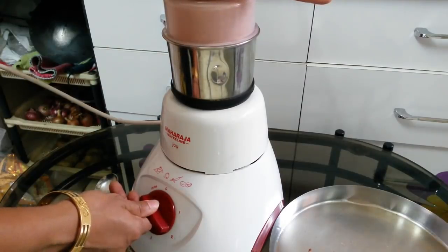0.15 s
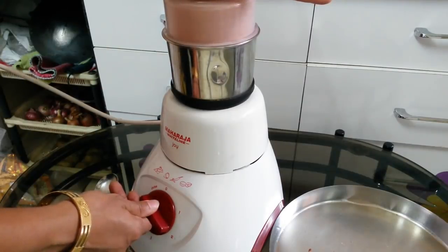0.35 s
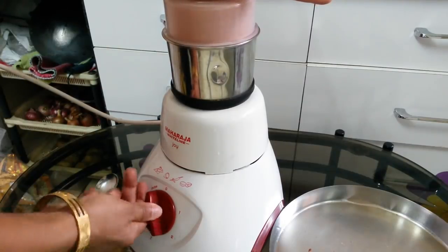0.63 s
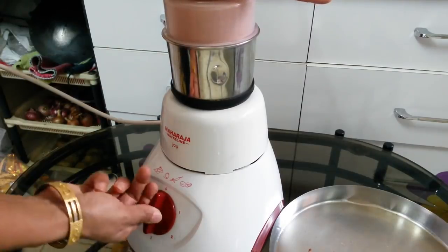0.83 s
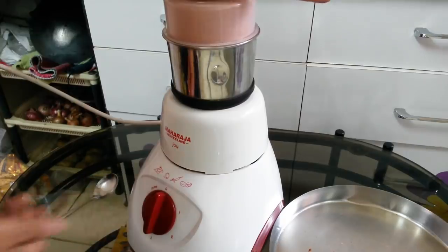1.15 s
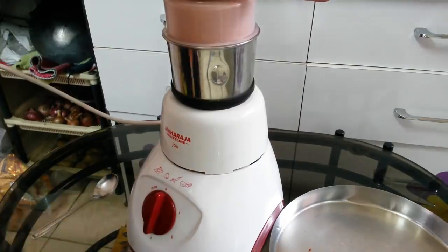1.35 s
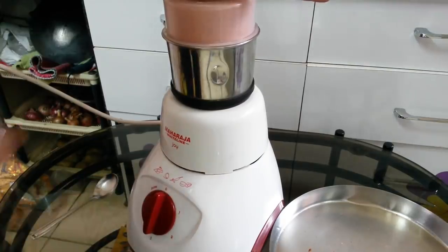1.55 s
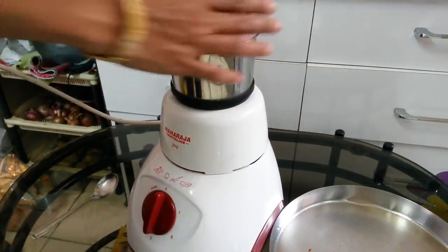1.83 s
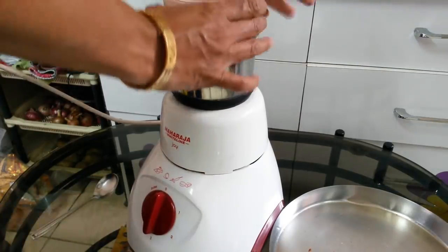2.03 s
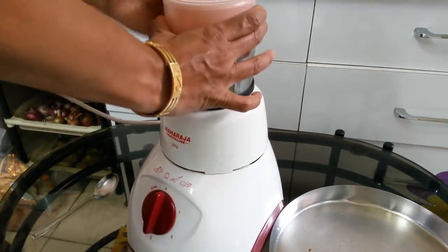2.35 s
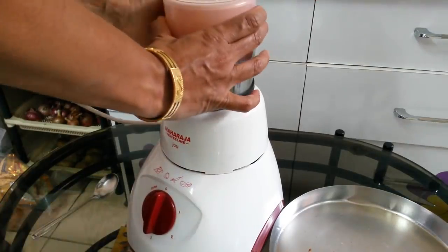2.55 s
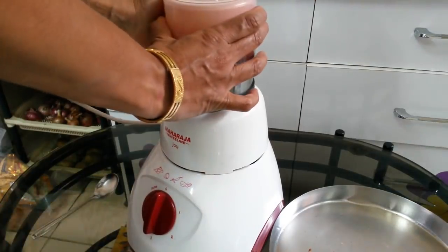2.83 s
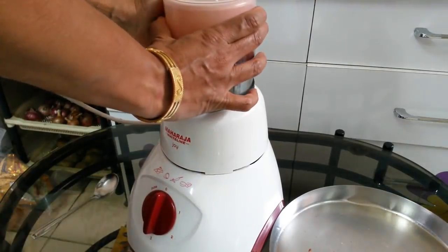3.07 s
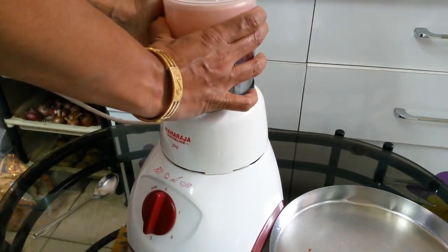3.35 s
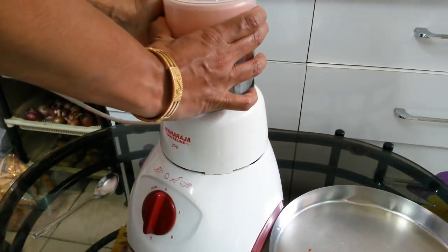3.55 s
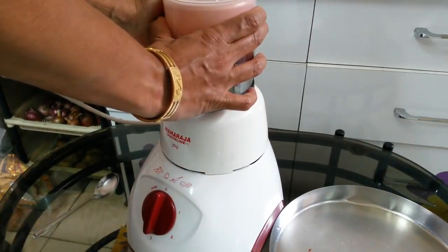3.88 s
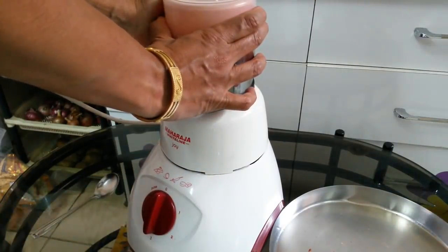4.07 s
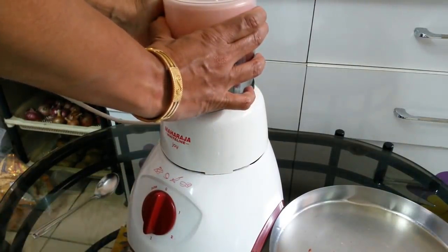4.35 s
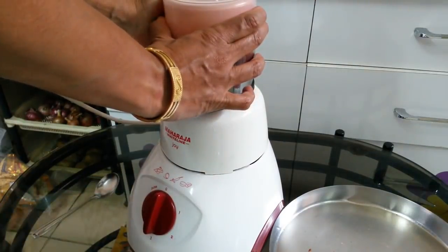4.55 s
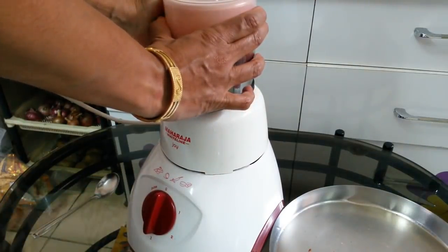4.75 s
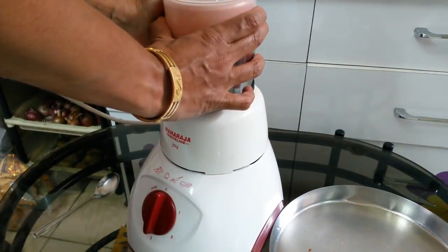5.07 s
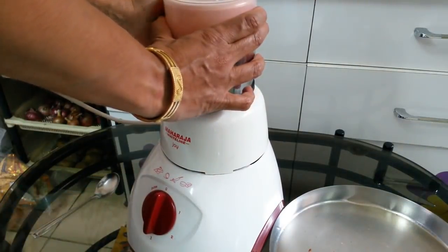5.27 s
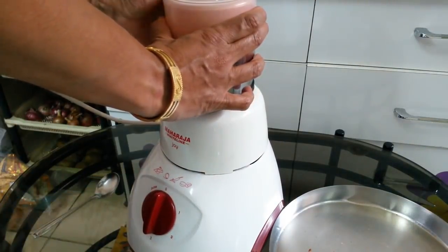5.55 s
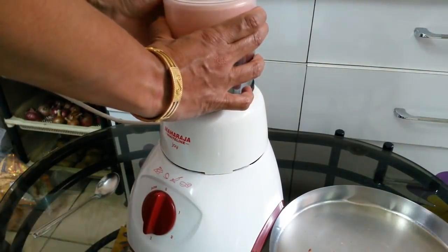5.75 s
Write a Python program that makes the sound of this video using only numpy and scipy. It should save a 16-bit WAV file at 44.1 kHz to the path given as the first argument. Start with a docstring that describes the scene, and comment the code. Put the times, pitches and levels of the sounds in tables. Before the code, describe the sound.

A mixer grinder is running at full roar from the first instant, heard very close in a tiled kitchen with tight, bright reflections. Dry slices churn in a steel jar as dense midrange rushing noise, covered by a hissing hail of grit, coarser and brighter at first, then more powdery. Beneath lies a steady low motor hum around 260 to 275 hertz, a rough coupling chatter and a thin whine. At 0.84 seconds the speed knob snaps with a hard, dry click; the motor sags for a moment, then eases up slightly in pitch over about half a second. Sharp metallic ticks dot the sound, notably at 0.4, 0.75, 2.7 and 3.2 seconds, with brief crunches between. From 1.9 to 2.3 seconds a hand closes on the jar, making the grind somewhat louder and more resonant. Soft low thuds come near 3, 4.1 and 5.4 seconds. The grinding continues to the end, about 5.9 seconds.

```python
"""An electric mixer grinder chops dry slices in a steel jar, close by in a tiled kitchen.
Blades, fan and commutator are tones locked to one shaft; its speed knob clicks up a step, the motor
sags and climbs, then a hand presses the jar down. Churning slices and a hail of grit are impacts and
noise ringing the jar through rushing air; crunches are bites of noise, chips ringing ticks.
The drive coupling chatters, and the base thuds softly on a glass table as low decaying sines."""
import sys
import numpy as np
from scipy import signal
from scipy.fft import rfft, irfft
from scipy.io import wavfile
from scipy.ndimage import uniform_filter1d

SR = 44100
rng = np.random.default_rng(int(sys.argv[2]) if len(sys.argv) > 2 else 0)


def wrap_up_sound(samples):
    """Save the sound to the file named by the first command line argument, as 16-bit audio."""
    columns = np.atleast_2d(samples).T
    # keep every value between -1 and 1, then stretch to whole-number steps
    tamed = np.clip(columns, -1, 1)
    steps = np.round(tamed * 32767).astype(np.int16)
    wavfile.write(sys.argv[1], SR, steps)


N = 260631
T = np.arange(N) / SR  # s
FREQ = np.maximum(np.arange(N // 2 + 1) * SR / N, 1)  # Hz

BLADES, FAN_VANES, BARS = 3, 21, 36  # parts round the shaft; bars are on the commutator
KNOB_S = .8403  # the speed knob clicks


def shaft_speed():
    """Steady on the low setting, a sag as the knob turns, then an easing climb to the high one."""
    low_hz, high_hz, sag_hz = 86.95, 92.0, 2.7  # turns per second
    coast_s, pickup_s, climb_s = .08, .03, .29  # the pickup comes just after the click
    since = T - KNOB_S - pickup_s
    coasting = low_hz - sag_hz * np.clip(1 + since / coast_s, 0, 1)
    return high_hz + (coasting - high_hz) * np.exp(-np.maximum(since, 0) / climb_s)


def motor(turns, load_db, grip):
    """Three blades hum, the rotor adds weaker orders, the fan's whine wavers, commutator bars sing."""
    # rotor tones: [multiples of shaft speed], and their [level against the blade hum, dB]
    rotor_orders = [2, 4, 6, 7, 9, 10, 25, 64]
    rotor_db = [-19, -16.5, -15.5, -22, -18.5, -22, -17.5, -14]
    # the blade hum swells or dips briefly: (time [s], half length [s], change [dB])
    hum_swells = [(.838, 0.013, -4), (.94, 0.053, 5), (1.25, .08, 0), (1.425, 0.04, -5.5), (1.86, 0.04, -3),
                  (2.3, 0.022, 5.5), (2.4, 0.022, 0), (2.82, 0.017, -2), (3.09, 0.023, -2.5),
                  (4.05, .025, 0), (4.51, .03, 3), (5.462, 0.13, 2.5)]
    # fan whine, flaring as the motor climbs and firming up late: (time [s], level [dB])
    fan_level = [(0, -35), (.3, -31), (.8, -33), (.9, -36), (1.0, -35), (1.07, -24.5), (1.15, -33.5),
                 (1.33, -31), (1.42, -35), (1.6, -39), (1.9, -34.5), (4.2, -36), (4.55, -31.5), (5.9, -34)]
    hum_db, hum_follow = -30, 1.06  # level at mean load; dB gained per dB of load
    throb_hz, throb_depth = 10.2, .16
    ripple_hz, ripple_depth = 100, .2  # the torque pulses twice per mains cycle
    brush_db, brush_grows_s, brush_db_per_s = -38, 2.7, 3  # commutator whine, and when it starts to grow
    rotor_loose_db = -3.5  # hand off against full grip: the pressed jar couples to the shaft

    hum = undb(hum_db + hum_follow * load_db + swells(hum_swells) + 0.16 * walk(4.9))
    throb = 1 + throb_depth * np.sin(2 * np.pi * throb_hz * T)
    ripple = 1 + ripple_depth * np.sin(2 * np.pi * ripple_hz * T)
    blade_tone = tone(turns, BLADES, flutter=0.17, flutter_hz=30.4, spread=0.39)
    blades = place(throb * ripple * blade_tone, pan_db=-4.5)
    rotor = sum(undb(db) * tone(turns, order, flutter=1.05, flutter_hz=8.4, spread=0.24)
                for order, db in zip(rotor_orders, rotor_db))
    rotor = place(rotor, pan_db=-6.0) * undb(rotor_loose_db * (0.5 - grip))

    fan = undb(curve(fan_level)[0])
    wobble = .007 * walk(9) * (.5 + .5 * grip)  # turns
    vanes = place(tone(turns + wobble, FAN_VANES, flutter=0.88, flutter_hz=26, spread=0.28), pan_db=4.0)

    brush = undb(brush_db + brush_db_per_s * np.maximum(T - brush_grows_s, 0))
    bars = tone(turns, 2 * BARS, flutter=0.4, flutter_hz=28, spread=0.63)
    # the next commutator overtone reaches the two microphone ports in opposite phase
    overtone = tone(turns, 3 * BARS, flutter=1.8, flutter_hz=28, spread=.8) * np.array([[1], [-1]])
    return hum * (blades + rotor) + fan * vanes + brush * (bars + undb(-15) * overtone)


def coupling(turns, load_db):
    """The four drive teeth chatter against the jar's coupling."""
    chatter_db = -30.5  # at mean load
    knocks = rattle(turns, order=4, sharpness=5) * rng.standard_normal((2, N))
    chatter = colour(knocks, shape([(500, -25), (1100, -6), (1800, 0), (2700, -5), (3500, -2),
                                    (6000, -1), (10000, -14)]))
    return undb(chatter_db + load_db) * unit(chatter)


def grinding(turns, load_db, grip):
    """Slices tumble and grit pelts the wall, in flurries and a little more at each blade pass."""
    # slices churning in the air stream, and grit on steel: (frequency [Hz], level [dB per Hz])
    churn_colour = [(30, -51), (70, -38), (115, -18.5), (160, -2.5), (230, -6.5), (310, -4.5), (400, -0.7),
                    (520, -5.5), (750, -4.5), (1200, -3.5), (1500, 4), (1750, 2.8), (1950, 0), (2700, -1),
                    (4500, -19.5)]
    grit_colour = [(1500, -46), (2750, -10.5), (3200, -2), (3900, -5.5), (4350, -4.5), (4800, -5.5),
                   (5600, -0.5), (6800, 0.75), (7600, 0.5), (8200, -5), (9500, -6.5), (11500, -10.3),
                   (13000, -12.5), (14500, -30)]
    # the slices fall clear of the blades for a moment: (time [s], half length [s], change [dB])
    lulls = [(1.13, 0.044, -0.5), (1.57, .06, -1.5), (3.77, 0.046, -1.7), (5.2, 0.06, -2)]
    # the grit thins out or showers briefly: (time [s], half length [s], change [dB])
    showers = [(.84, 0.037, -2), (1.45, .035, -2.5), (1.82, .03, 0.8), (5.03, 0.025, 1.2)]
    # how the pressed jar rings differently: (frequency [Hz], change at full grip [dB])
    grip_colour = [(150, -2), (370, -1.5), (600, -0.5), (1000, -1), (1500, -1.5), (1850, 1), (2250, 0.5),
                   (2700, -1.5), (3200, -0.5), (4300, -0.5), (5700, -0.5), (7000, -0.5), (9000, -2)]
    # resonances that speak once the jar is pressed: (frequency [Hz], width [Hz], lift [dB])
    pressed = [(1035, 50, 1.5), (1905, 70, 1.5), (2133, 50, 3.5), (2305, 70, 2.5), (12102, 45, 6),
               (12884, 60, 7), (13822, 45, 6)]
    # levels at mean load, and the dB gained per dB of load
    churn_db, churn_follow = -23.5, 0.97
    grit_db, grit_follow = -19, 0.99
    spray_start_db, spray_fade_s = 3, 1

    sweep_db = 0.22 * np.cos(2 * np.pi * BLADES * turns)
    flurry = undb(sweep_db + 0.17 * walk(23))
    tumble = undb(swells(lulls) + 0.31 * walk(33))
    slices = hail(2500, spread_db=0.5)
    air = 1.35 * rng.standard_normal(N)
    churn = jar(flurry * tumble * (slices + air), churn_colour)

    # coarse pieces at the start strike harder and more sparsely than the later powder
    coarse = np.exp(-T / 1.6) * hail(700, spread_db=2.8)
    powder = hail(3500, spread_db=3.5)
    impacts = powder + 1.3 * coarse + 2.3 * rng.standard_normal(N)
    # even out the level over an eighth of a second
    impacts = impacts / np.sqrt(uniform_filter1d(impacts ** 2, size=SR // 8))
    clumps = undb(0.55 * walk(130))
    grit = jar(flurry * clumps * undb(swells(showers)) * impacts, grit_colour)

    # the finest spray dies down as the load turns to powder
    spray = colour(grit, shape([(7500, -48), (8600, -2.0)]))
    spray_db = spray_start_db * np.exp(-T / spray_fade_s)
    grit = grit + spray * (undb(spray_db - spray_db.mean() + 1.12 * walk(15)) - 1)

    free = churn * undb(churn_db + churn_follow * load_db) + grit * undb(grit_db + grit_follow * load_db)
    held = colour(free, shape(grip_colour) + resonances(pressed))
    return (1 - grip) * free + grip * held


def shifting(x):
    """The moving load lets each zone of the wall swell and fade by itself, and the rim sing up."""
    # wall zones the load damps and frees: (frequency [Hz], width [Hz], wander [dB])
    wall_zones = [(1520, 300, .7), (2200, 400, .6), (3300, 600, .9)]
    # the rim sings up when grit sweeps round it: (time [s], half length [s], change [dB])
    rim_swells = [(1.81, .04, 3), (2.37, .07, 1), (2.87, .06, 1.8), (3.58, .05, 1.5), (4.07, .04, 2),
                  (5.04, .05, 1.8), (5.46, .07, 1), (5.83, .05, 1.5)]
    wall = sum(band(x, hz, width) * (undb(db * walk(7)) - 1) for hz, width, db in wall_zones)
    rim = band(x, hz=6550, width=520)
    return x + wall + rim * (undb(swells(rim_swells)) - 1)


def crunches(turns):
    """The blades bite a slice several times in a row, and the wall rings where it is pinned."""
    # slices caught against the wall: (time [s], level [dB], ring [Hz], half length [s])
    caught = [(0.103, -26, 1510, 0.028), (.61, -30, 1610, 0.022), (1.045, -27, 1550, .025),
              (1.335, -23, 1660, .025), (2.2, -21, 1700, 0.022), (2.476, -27, 1520, .03),
              (2.94, -26, 1900, .022), (3.534, -24, 1800, 0.033), (4.54, -29, 1830, .025),
              (4.94, -25, 2100, .035), (5.66, -27, 1590, 0.035)]
    width_hz = 600
    bites = kitchen(rattle(turns, order=BLADES, sharpness=4) * rng.standard_normal(N))
    return sum(undb(db) * np.exp(-((T - s) / half) ** 2) * unit(band(bites, hz, width_hz))
               for s, db, hz, half in caught)


def chips():
    """Hard pieces tick on the steel: each rings a random cluster of wall modes, as if by where it lands."""
    # strikes on the jar wall: (time [s], level [dB], ring [Hz])
    strikes = [(.0528, -17, 7400), (.2683, -17, 6900), (.3147, -16, 6900), (.385, -12, 7400),
               (.4688, -16, 6300), (.7535, -14.5, 6900), (1.1815, -17, 7000), (1.2195, -16, 7000),
               (1.4945, -15.5, 6600), (2.3456, -15, 7450), (2.5421, -15, 7000), (2.7417, -14, 5750),
               (3.168, -11, 7150), (3.3348, -16, 7150), (5.7165, -13, 6600)]
    t60, cluster, crack_db = .028, .1, -7  # s; relative spread of the modes; crack against ring
    out = np.zeros((2, N))
    age = np.arange(int(2 * t60 * SR)) / SR
    for s, db, hz in strikes:
        modes = hz * (1 + cluster * rng.standard_normal((8, 1)))
        ring = np.sin(2 * np.pi * (modes * age + rng.random((2, 8, 1)))).sum(axis=1)
        tick = unit(ring) + undb(crack_db) * rng.standard_normal(len(age))
        start = int(s * SR)
        out[:, start:start + len(age)] += undb(db) * tick * np.exp(-np.log(1000) * age / t60)
    return colour(out, shape([(300, -40), (4000, 0), (10000, 0), (14000, -8)]))


def knob():
    """The speed switch snaps over: a dry crack and a short ping of its contact spring."""
    level_db = -6.5
    spring_hz, t60, crack_db = 7650, .007, -3  # t60 in s; crack against ping
    ping = np.sqrt(2) * np.sin(2 * np.pi * spring_hz * (T - KNOB_S))
    snap = (ping + undb(crack_db) * rng.standard_normal(N)) * strike(KNOB_S, t60)
    return undb(level_db) * colour(snap, shape([(200, -40), (1000, -18), (5000, -10), (7500, 0), (14000, 0)]))


def bumps():
    """The base's rubber feet give soft, low thuds: sines that swell in and die away."""
    # the base bumps on the glass table: (time [s], strength [dB], pitch [Hz])
    thuds = [(3.022, -36, 85), (3.128, -38, 78), (4.085, -37, 112), (4.44, -41, 105), (5.433, -30, 96)]
    t60, rise_s = .13, .012  # s
    out = 0
    for s, db, hz in thuds:
        age = np.maximum(T - s, 0)
        swell = 1 - np.exp(-(age / rise_s) ** 2)
        out = out + undb(db) * swell * np.sin(2 * np.pi * hz * age) * np.exp(-np.log(1000) * age / t60)
    return out


def jar(drive, points):
    """A drive heard through the ringing jar and the room; the middle has rms 1."""
    # jar and housing resonances: (frequency [Hz], width [Hz], lift [dB])
    jar_modes = [(174, 26, 4.5), (920, 55, 5), (1038, 38, 9), (1415, 36, 3), (1492, 24, 2.5), (1538, 20, 1),
                 (11950, 90, 3)]
    # colour of the two microphone ports: (frequency [Hz], left minus right [dB])
    tilt = [(60, 2), (200, -1.5), (370, -3), (690, -1), (2300, -1), (4300, -0.5), (5000, 4), (5900, 2.5),
            (6500, 6), (7000, -2.5), (7600, -6.5), (9000, -4.5), (12000, -3.5), (14500, -7.5)]
    # between the strong resonances the thin wall has countless weak ones
    weak_hz = np.arange(1100, SR / 2, 24)
    weak_db = 1.4 * np.interp(FREQ, weak_hz, rng.standard_normal(len(weak_hz)), left=0)
    side_db = np.array([[1], [-1]]) * shape(tilt) / 2
    heard = colour(kitchen(drive), shape(points) + resonances(jar_modes) + weak_db + side_db)
    return heard / np.std(heard.mean(axis=0))


def kitchen(x, t60=0.032):
    """Direct sound plus reflections: noise under a decaying energy makes each echo a fresh, diffuse smear."""
    # treble comes mostly by way of tiles and table: (frequency [Hz], reflected minus direct [dB])
    wet = [(60, 16), (170, -8.5), (400, -2.5), (700, 5), (1050, 1), (2000, 5), (3500, 6.5), (7000, 13),
           (14000, 10)]
    keep = np.exp(-2 * np.log(1000) / (t60 * SR))
    energy = signal.lfilter([1 - keep], [1, -keep], x ** 2)
    diffuse = np.sqrt(energy) * rng.standard_normal((2, N))
    direct = np.array([np.roll(x, 2), x])  # the right port is a little nearer
    wet_db = shape(wet)
    # the second gain holds the summed power of direct and reflected sound
    return colour(direct + colour(diffuse, wet_db), -10 * np.log10(1 + undb(wet_db) ** 2))


def tone(turns, order, flutter, flutter_hz, spread):
    """A multiple of the shaft rotation; it flutters, partly differently on each side."""
    def scatter():
        return (walk(flutter_hz) + 1j * walk(flutter_hz)) / 2
    sway = 1 + flutter * scatter() + spread * np.array([scatter(), scatter()])
    return unit(np.real(sway * np.exp(2j * np.pi * (order * turns + rng.random()))))


def rattle(turns, order, sharpness):
    """Short knocks, order of them to a turn, each of its own strength; an envelope of rms 1."""
    phase = order * turns
    strength = undb(3 * rng.standard_normal(N))[phase.astype(int)]
    return unit(strength * np.exp(-sharpness * (phase % 1)))


def hail(rate, spread_db):
    """Random impacts, mostly tiny, a few large; rate a second."""
    hit = rng.random(N) < rate / SR
    size = undb(spread_db * np.minimum(rng.exponential(size=N), 4))
    return unit(hit * size * rng.standard_normal(N))


def strike(s, t60):
    """The envelope of a blow at s: instant attack, exponential decay."""
    return (T > s) * np.exp(-np.log(1000) * np.maximum(T - s, 0) / t60)


def swells(rows):
    """Bell-shaped rises and dips of level, in dB."""
    return sum(db * np.exp(-((T - s) / half) ** 2) for s, half, db in rows)


def walk(rate):
    """Smooth chance of spread 1 that changes about rate times a second."""
    return unit(irfft(rfft(rng.standard_normal(N)) / (1 + (FREQ / rate) ** 4), N))


def resonances(modes):
    """(Hz, width, lift) modes as dB on every frequency."""
    return sum(db / (1 + (2 * (FREQ - hz) / width) ** 2) for hz, width, db in modes)


def band(x, hz, width):
    """The part of a sound that lies in one broad resonance."""
    return irfft(rfft(x) / (1 + (2 * (FREQ - hz) / width) ** 4), N)


def shape(points):
    """A (Hz, dB) table as dB on every frequency."""
    hz, db = np.transpose(points)
    return np.interp(np.log(FREQ), np.log(hz), db)


def colour(x, db):
    """Filter by a dB gain on every frequency."""
    return irfft(rfft(x) * undb(db), N)


def curve(rows):
    """The columns of a time table, joined by straight lines."""
    s, *columns = np.transpose(rows)
    return [np.interp(T, s, c) for c in columns]


def place(x, pan_db):
    """Set a sound between left and right; pan_db is left minus right."""
    return x * undb(np.array([[pan_db], [-pan_db]]) / 2)


def undb(db):
    """Decibels to gain."""
    return 10 ** (np.asarray(db) / 20)


def unit(x):
    """Scale to rms 1."""
    return x / np.sqrt(np.mean(x ** 2))


def scene():
    """One shaft drives the machine; the shifting load sets the hum, chatter, churn and grit levels."""
    # how hard the load beats on the jar; only its change about the mean counts: (time [s], level [dB])
    beating = [(0.06, -20), (0.7, -19), (0.85, -20.5), (1.3, -20.5), (1.9, -20.5), (2.27, -18.5),
               (2.36, -17.5), (2.7, -18), (3.73, -17.5), (3.82, -19.5), (4.0, -18), (5.03, -17),
               (5.86, -17)]
    # the hand closes on the jar: (time [s], grip [0-1])
    hand = [(0, 0), (1.9, 0), (2.3, 1), (5.91, 1)]
    speed_hz = shaft_speed() * (1 + 0.0016 * walk(3.5))  # the speed trembles
    turns = np.cumsum(speed_hz) / SR
    beating_db, = curve(beating)
    load_db = beating_db - beating_db.mean()
    grip, = curve(hand)
    machine = motor(turns, load_db, grip) + coupling(turns, load_db)
    food = shifting(grinding(turns, load_db, grip)) + crunches(turns) + chips()
    return machine + food + knob() + bumps()


def record(dry):
    """The recorder rounds the tallest peaks and cuts the top."""
    top_hz = 14500
    rounded = dry / (1 + (dry / .9) ** 6) ** (1 / 6)
    return signal.sosfilt(signal.ellip(10, .2, 80, top_hz, fs=SR, output="sos"), rounded)


dry = scene()
out = record(dry)
wrap_up_sound(out)
```